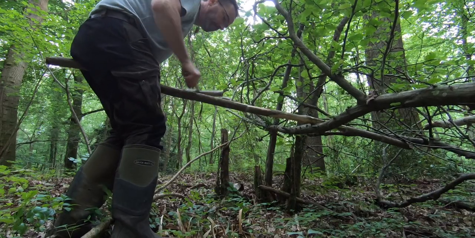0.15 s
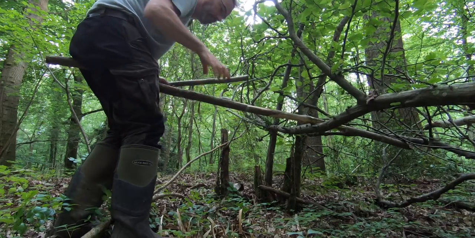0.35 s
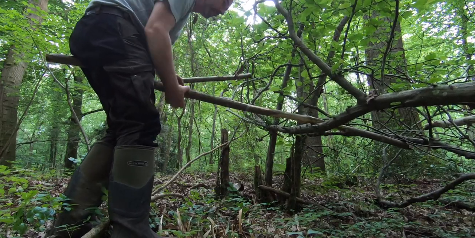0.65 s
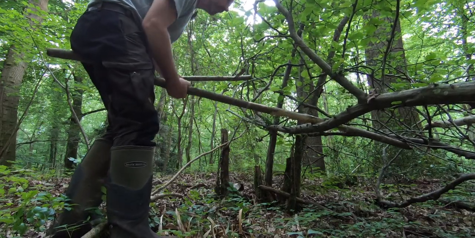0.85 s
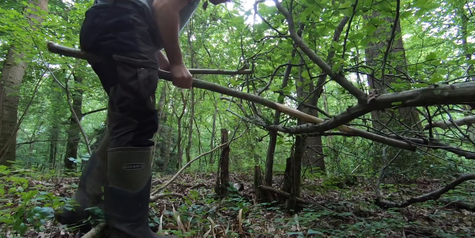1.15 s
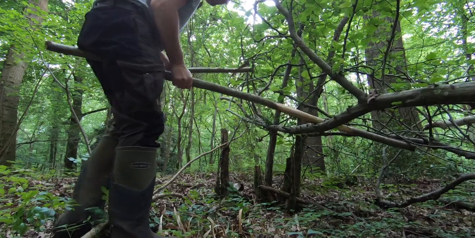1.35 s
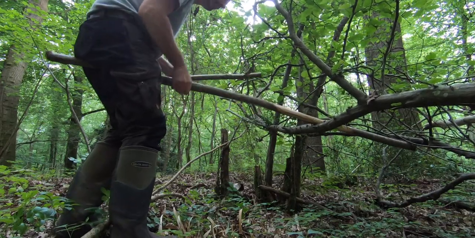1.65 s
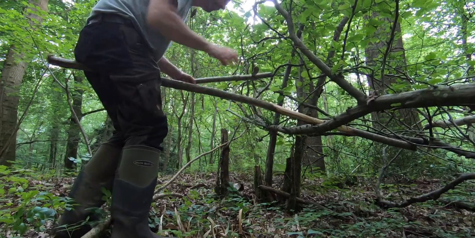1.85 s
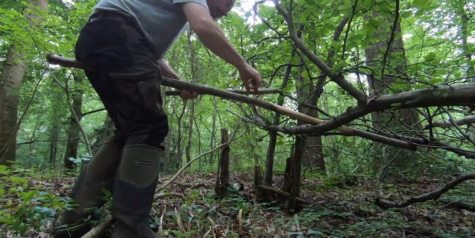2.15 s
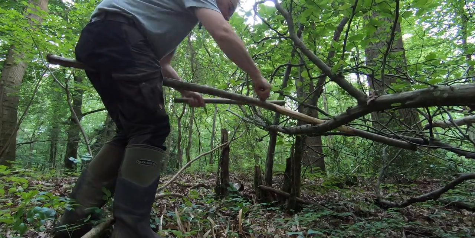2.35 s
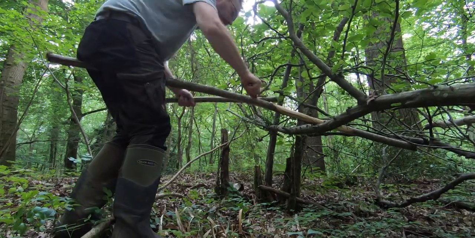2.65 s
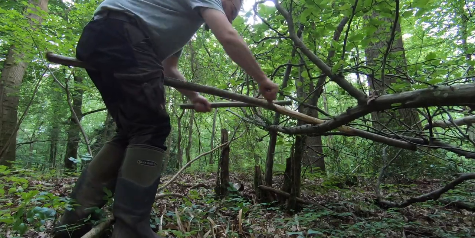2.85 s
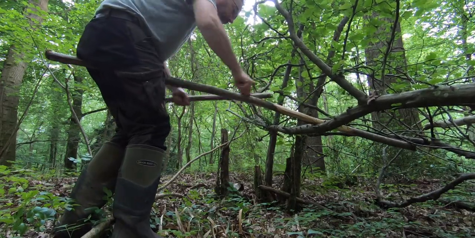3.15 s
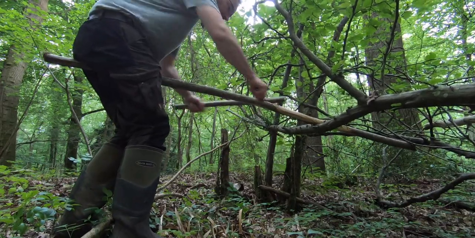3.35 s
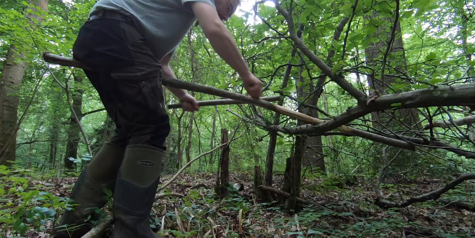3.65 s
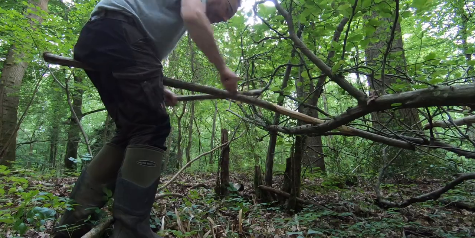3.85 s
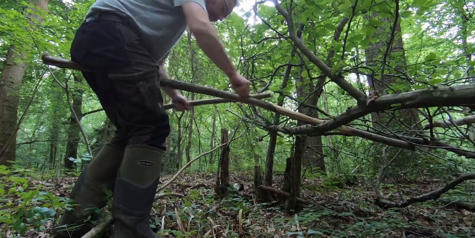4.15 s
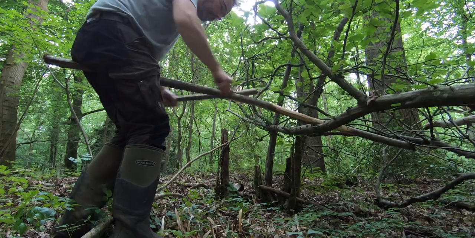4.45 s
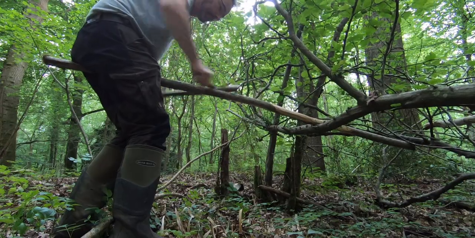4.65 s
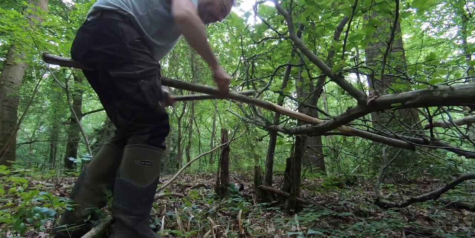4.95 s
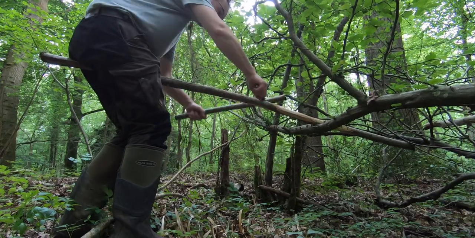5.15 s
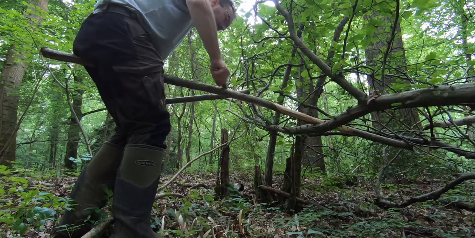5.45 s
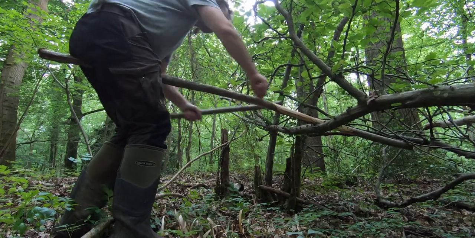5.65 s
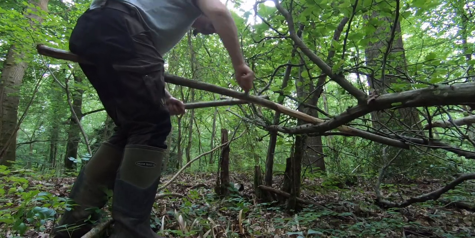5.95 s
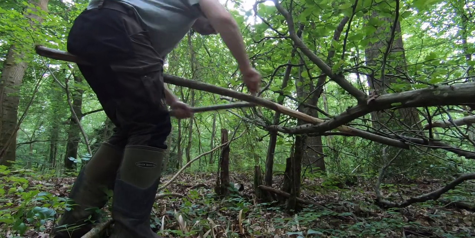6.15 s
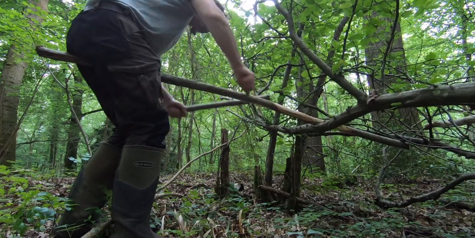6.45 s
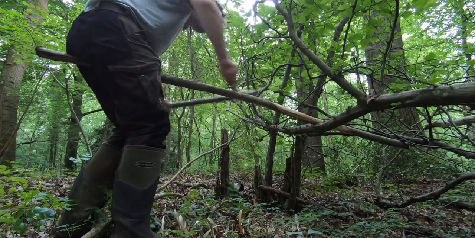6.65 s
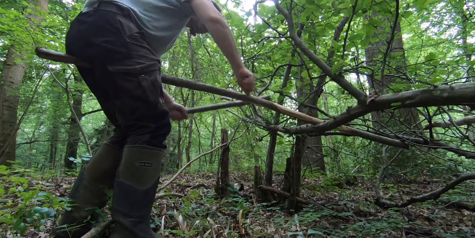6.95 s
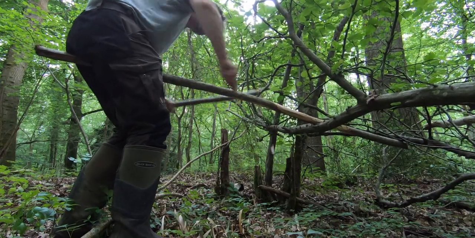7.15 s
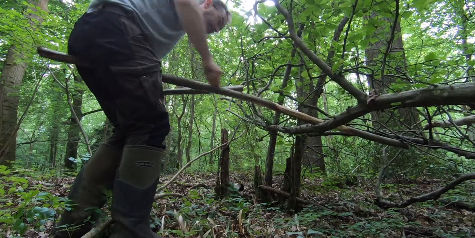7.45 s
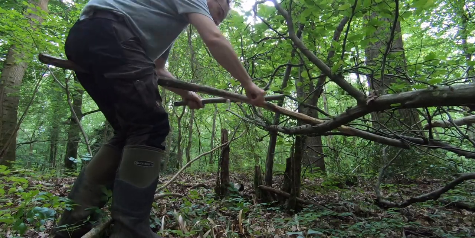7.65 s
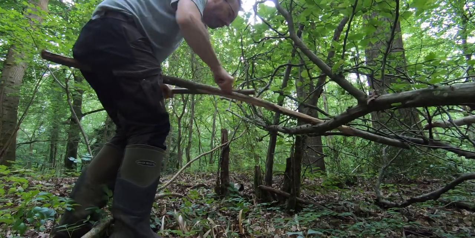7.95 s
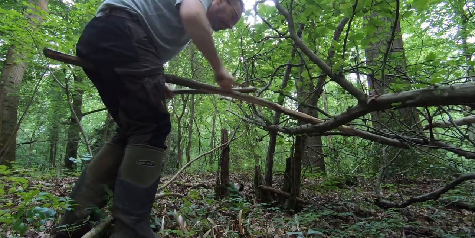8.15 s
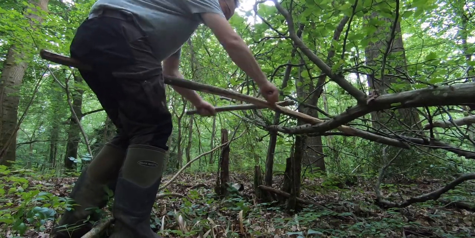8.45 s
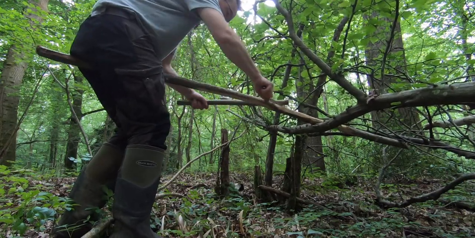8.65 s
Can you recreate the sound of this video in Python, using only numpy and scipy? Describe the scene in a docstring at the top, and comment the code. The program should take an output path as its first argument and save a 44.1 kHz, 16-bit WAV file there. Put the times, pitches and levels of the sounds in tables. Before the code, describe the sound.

A knife shaves a green pole in short raspy strokes with woody knocks and splintering snaps, while faint birds whistle in a quiet woodland.

```python
"""Quiet woodland: a few steps away a knife shaves a green pole, over a far rumble, a low drone and still air.
Random stick-slip impulses ring the pole and blade as the edge chatters; filtered grains make tearing fibres.
Snaps are bursts of resonant noise, knocks are short pushes on the pole's modes, and the blade slides back.
A boot and shifting leaves crackle with coloured grains; two birds, sung by gliding sines, echo among trees."""
import sys
import numpy as np
from scipy import signal
from scipy.fft import rfft, irfft, next_fast_len
from scipy.io import wavfile
from scipy.ndimage import uniform_filter1d, map_coordinates

SR = 44100
rng = np.random.default_rng(int(sys.argv[2]) if len(sys.argv) > 2 else 0)


def bounce(signal):
    """Save signal as a 16-bit WAV file at the path given by the first command-line argument."""
    frames = np.transpose(np.atleast_2d(signal))
    limited = np.clip(frames, -1, 1)
    pcm = np.round(limited * 32767).astype(np.int16)
    wavfile.write(sys.argv[1], SR, pcm)


N = 388521  # length in samples

# In every table, level_db is a relative level: the layers are trimmed again when they are mixed.


def amp(db):
    """Decibels to gain."""
    return 10 ** (np.asarray(db) / 20)


def unit(x):
    """Scale to rms 1."""
    return x / np.sqrt(np.mean(x ** 2) + 1e-20)


def along(points, hz):
    """Read a curve of (Hz, value) points on a log frequency axis."""
    f, v = np.transpose(points)
    return np.interp(np.log(hz + 1), np.log(f + 1), v)


def over_time(points):
    """Read a curve of (s, value) points at every sample."""
    return np.interp(np.arange(N) / SR, *np.transpose(points))


def add(track, s, sound):
    """Mix a sound into a track at time s."""
    part = track[max(round(s * SR), 0):][:len(sound)]
    part += sound[:len(part)]


def wobble(rate):
    """A smooth random curve, rate knots a second."""
    knots = rng.standard_normal(int(N * rate / SR) + 4)
    return map_coordinates(knots, [np.arange(N) * rate / SR])


def filtered(x, response):
    """Filter x by a complex response of frequency."""
    n = x.shape[-1]
    m = next_fast_len(n + 8192)  # padding gives the ringing room to die away
    return irfft(rfft(x, m) * response(np.fft.rfftfreq(m, 1 / SR)), m)[..., :n]


def coloured(x, spectrum):
    """Shape x by a spectrum of (Hz, dB) points, at rms 1."""
    return unit(filtered(x, lambda f: amp(along(spectrum, f))))


def ring(x, modes):
    """Drive a set of resonances (Hz, width Hz, dB) with x."""
    return filtered(x, lambda f: sum(amp(db) * 1j * f * width / (hz * hz - f * f + 1j * f * width)
                                     for hz, width, db in modes))


def slips(rate, spread_db, clump_rate, clump_db):
    """Tiny stick-slip impulses, rate a second on average, whose size varies singly and in clumps."""
    uneven_db = spread_db * np.clip(rng.standard_normal(N), -2, 2)
    size = amp(uneven_db + clump_db * wobble(clump_rate))
    return (rng.random(N) < rate / SR) * rng.choice([-1, 1], N) * size


def pressure(start, rise, hold, fall, steep=1, linger=1):
    """Gain of one stroke: pressure builds through the start time, holds and lets go."""
    range_db, bite_curve, release_curve = 22.5, 1.37, 0.95  # range of the build-up; bend of rise and fall
    t = np.arange(N) / SR - start
    near = (t > -rise) & (t < rise + hold + 3 * fall * linger)
    t, gain = t[near], np.zeros(N)
    building = np.maximum(1 - t / rise, 0) ** bite_curve
    easing = np.maximum((t - rise - hold) / (fall * linger), 0) ** release_curve
    gain[near] = amp(-range_db * (steep * building + easing))
    return gain


def swells(rows, roundness):
    """Gain of light movements (start s, length s, dB), each swelling and fading as a rounded arch."""
    gain = np.zeros(N)
    for s, length, db in rows:
        arch = np.abs(np.sin(np.linspace(0, np.pi, int(length * SR)))) ** roundness
        add(gain, s, amp(db) * arch)
    return gain


# how alike left and right are in the diffuse background: pitch_hz, correlation (1 same, -1 opposed)
ALIKE = [(60, 0.94), (130, 1), (290, 0.48), (640, -0.22), (1410, -0.058), (3100, 1), (6820, 0.44),
         (15000, -0.5)]


def rush(spectrum):
    """Diffuse stereo noise with its mid at rms 1; the mid-side balance sets how alike the ears are."""
    turn = lambda f: np.arccos(np.clip(along(ALIKE, f), -1, 1)) / 2
    balance = lambda f: np.array([np.cos(turn(f)), np.sin(turn(f))])
    mid, side = filtered(rng.standard_normal((2, N)), lambda f: amp(along(spectrum, f)) * balance(f))
    return np.array([mid + side, mid - side]) / np.std(mid)


# slow level curve of the far rumble, before its flutter: time_s, level_db
RUMBLE = [(0, -66), (1.0, -58), (1.55, -62.5), (2.3, -58.5), (3.2, -61.5), (4.8, -66.5), (6.4, -61),
          (7.7, -64.5), (8.8, -58)]


def rumble():
    """Far rumble: bass noise whose level drifts and flutters."""
    spectrum = [(15, -29), (30, -10.0), (48, -0.5), (90, -2.0), (120, -11), (200, -23.5), (500, -66)]
    return amp(over_time(RUMBLE) + 2.1 * wobble(4.2) + 3.1 * wobble(11)) * rush(spectrum)


# slow level curve of the low drone, before its flutter: time_s, level_db
DRONE = [(0, -59.5), (2.3, -55), (4.2, -63), (5.2, -57.5), (6.3, -62.5), (6.9, -58.5), (8.8, -63)]


def drone():
    """Low drone: a band of noise pitched above the rumble, flickering a little."""
    spectrum = [(60, -30), (120, -6.5), (160, 3.5), (200, -1), (260, -9.5), (320, -13.5), (450, -21.5), (900, -68)]
    return amp(over_time(DRONE) + 0.5 * wobble(3.16) + 1.64 * wobble(14)) * rush(spectrum)


# spectrum of the still air: pitch_hz, level_db
AIR = [(150, 7.5), (450, -4), (800, 5.5), (1400, 0.5), (2500, 0.5), (4000, -3), (6500, -10), (10000, -14),
       (11500, -22.5), (14500, -31), (15700, -37)]


def air():
    """Still air: soft broad noise that swells slowly."""
    return amp(-63 + 1.5 * wobble(1.66)) * rush(AIR)


# leaves rustle as the worker shifts about: start_s, length_s, level_db
RUSTLES = [(0, 0.69, -66), (.8, 1.72, -62.5), (3.1, 0.64, -60.5), (3.8, 1.5, -61.5), (4.8, 0.27, -56.5),
           (5.9, 0.55, -65.5), (7.2, 1.1, -65.5), (8.25, 0.24, -59)]


def rustle():
    """Light leaf rustle: clumped grains, drawn separately for left and right."""
    leaves = [(500, -1), (3000, 2.5), (6000, 0.5), (10000, -4.5), (11500, -15), (14000, -18), (15500, -40)]
    grains = [slips(rate=3000, spread_db=4.0, clump_rate=45, clump_db=6) for _ in range(2)]
    return amp(-2.5) * swells(RUSTLES, roundness=0.32) * np.array([coloured(x, leaves) for x in grains])


# notes of a far songbird: start_s, length_s, start_hz, end_hz, level_db, trill_depth_hz
SONG = [(0, 0.054, 2600, 2737, -53, 17), (0, 0.18, 2820, 2740, -65.5, 30), (0.02, .4, 2271, 2329, -62, 5.5),
        (0.499, 0.19, 2150, 1947, -60.5, 200), (1.284, 0.085, 1885, 2036, -62.5, 91),
        (1.64, 0.28, 2350, 2634, -63.5, 180), (1.822, 0.047, 3224, 3210, -53.5, 220),
        (2.065, 0.03, 3550, 3486, -56, 97), (2.142, 0.061, 3860, 3975, -60, 50),
        (2.225, 0.053, 5230, 4850, -55.5, 34), (2.268, 0.056, 4890, 5020, -57, 20),
        (2.305, 0.072, 5010, 4380, -57, 20), (2.47, 0.088, 1840, 1812, -61.5, 61),
        (2.731, 0.11, 2370, 2206, -57, 270), (2.89, 0.094, 2756, 2706, -54.5, 13),
        (3.335, 0.089, 2063, 1980, -57, 88), (3.55, 0.12, 1882, 1821, -56, 16),
        (3.747, 0.13, 2000, 2290, -56.5, 130)]


def songbird(trill_rate=70):
    """Gliding sine notes, each trilled in pitch trill_rate times a second."""
    out = np.zeros(N)
    for s, length, start_hz, end_hz, db, trill_hz in SONG:
        t = np.arange(int(length * SR)) / SR
        hz = np.linspace(start_hz, end_hz, len(t)) + trill_hz * np.sin(2 * np.pi * trill_rate * t)
        tone = np.sin(2 * np.pi * np.cumsum(hz) / SR)
        add(out, s, amp(db) * signal.windows.tukey(len(t), .4) * tone)
    return out


# modes of the pole: pitch_hz, width_hz, level_db
POLE = [(738, 29, -8), (866.6, 47, 6), (1030, 150, -2.5), (1252, 37, -4.5), (1730, 71, -1),
        (2540, 270, -11.5), (3400, 79, -20)]


def pole(x, detune=0.07, travel_rate=7):
    """The pole's modes shift as blade and grip travel along it, here a random path over three places."""
    place = np.clip(wobble(travel_rate), -1, 1)
    out = np.zeros(N)
    for k in (-1, 0, 1):
        share = np.sqrt(np.clip(1 - abs(place - k), 0, 1))
        modes = [(hz * (1 + detune * k), width, db + rng.normal(0, 3.64)) for hz, width, db in POLE]
        out += ring(x * share, modes)
    return out


# the wood radiates little bass or high treble: pitch_hz, level_db
WOOD = [(200, -34), (430, -2), (650, 1), (4000, 2), (6500, -5), (10000, -4), (15000, -15)]


def radiated(x):
    """Colour a vibration as the wood radiates it, at rms 1."""
    return coloured(x, WOOD)


def shifting(x, depth_db):
    """The curling shaving has changing resonances of its own: a smooth random field over time and pitch."""
    z = signal.stft(x, nperseg=512)[2]
    field = uniform_filter1d(rng.standard_normal(z.shape), size=3, axis=0)
    field = uniform_filter1d(field, size=7, axis=1)
    return signal.istft(z * amp(depth_db * unit(field)), nperseg=512)[1][:N]


# resonances of the blade in the cut: pitch_hz, width_hz, level_db
BLADE = [(1900, 230, 3), (2720, 700, 14), (3540, 440, 12), (3900, 500, -46), (5355, 160, 19)]


def scrape():
    """The edge's stick-slip rings the blade, coloured by the shaving and the wood."""
    catches = slips(rate=1400, spread_db=1.5, clump_rate=110, clump_db=2.5)
    return radiated(shifting(ring(catches, BLADE), depth_db=4))


# resonances of the steel itself: pitch_hz, width_hz, level_db
STEEL = [(1800, 310, 4.5), (3400, 130, -4.5), (5700, 100, 10.5), (6000, 37, -8)]


def steel():
    """Dense uneven slips make the steel itself sing."""
    return radiated(ring(slips(rate=3000, spread_db=6, clump_rate=60, clump_db=7.0), STEEL))


# spectrum of tearing fibres: pitch_hz, level_db
FIBRES = [(300, -33), (2000, 0), (4500, 0), (6500, 0), (8300, -1.5), (9800, 3), (11200, -8), (13500, -8.5),
          (15500, -47)]


def tear():
    """Fine fibres part in a dense crackle coloured by the shaving."""
    breaks = slips(rate=5600, spread_db=1.0, clump_rate=280, clump_db=2.6)
    return coloured(shifting(breaks, depth_db=3.5), FIBRES)


# cuts of the knife (already biting at start_s):
# start_s, biting_in_s, full_depth_s, running_out_s, chatter_level_db, scrape_level_db, tearing_level_db
CUTS = [ (0.0, 0.0013, 0.029, 0.047, -43.5, -56, -58.5), (2.595, .065, 0.054, 0.082, -53.5, -57, -62),
        (2.99, 0.052, 0.03, 0.035, -48, -50.5, -58), (3.083, 0.02, 0.0032, 0.048, -39, -52, -39),
        (3.435, 0.066, .05, 0.054, -43, -52, -48), (3.58, 0.016, .003, 0.037, -66, -61, -54),
        (3.838, 0.078, 0.027, 0.1, -41.5, -48, -46.5), (4.231, 0.059, 0.017, 0.025, -48.5, -52.5, -52),
        (4.322, 0.024, 0.039, 0.048, -44.5, -51, -45.5), (4.685, 0.093, 0.0043, 0.039, -41, -47, -44),
        (5.286, 0.098, 0.019, .06, -45.5, -52, -51.5), (5.42, 0.04, .01, 0.13, -52.5, -56.5, -57),
        (5.86, 0.087, .006, 0.047, -40, -49, -51.5), (6.285, 0.01, 0.0088, 0.077, -46, -53.5, -53.5),
        (6.64, 0.047, 0.021, 0.052, -51.5, -58.5, -60.5), (6.76, 0.049, .03, 0.019, -56, -60, -58),
        (7.135, 0.096, 0.007, 0.023, -45, -55.5, -52.5), (7.295, 0.046, .008, 0.024, -45, -54.5, -49.5),
        (7.804, 0.046, 0.048, .1, -48, -54.5, -48.5), (7.9, 0.057, 0.0085, 0.024, -49, -48, -45),
        (7.978, 0.02, 0.038, 0.047, -58, -56, -45), (8.04, 0.026, 0.033, 0.044, -56.5, -61, -52.5),
        (8.53, 0.057, 0.051, 0.049, -56, -61.5, -57), ]


def cuts():
    """The edge catches and slips: the pole and blade ring, and fine fibres tear as it bites deeper."""
    bite, edge, tearing = np.zeros((3, N))
    for s, rise, hold, fall, chatter_db, edge_db, tear_db in CUTS:
        bite += amp(chatter_db) * pressure(s, rise, hold, fall)
        # the edge already scrapes under light pressure
        edge += amp(edge_db) * pressure(s, rise, hold, fall, steep=0.76)
        # fibres tear 3.6 ms late, need a deeper cut and go on parting after it
        tearing += amp(tear_db) * pressure(s + 0.0036, rise, hold, fall, steep=1.44, linger=1.35)
    catches = slips(rate=900, spread_db=0.0, clump_rate=120, clump_db=3)
    chatter = radiated(pole(catches))
    flex = unit(ring(ring(catches, [(155.0, 62, 0)]), [(156, 250, 0)]))  # the whole pole bends
    singing = np.minimum(amp(1.0) * edge, amp(-53))  # capped: a deep cut damps the steel
    wood = bite * (amp(-1.0) * chatter + amp(-6.0) * flex)
    blade = amp(2.5) * edge * scrape() + singing * steel()
    return wood + blade + amp(-0.5) * tearing * tear()


# blade and stick knocking on the pole: start_s, level_db, struck_spot_hz
KNOCKS = [(.012, -37.5, 830), (.616, -48, 614), (0.8246, -43, 660), (2.409, -35, 950), (3.087, -38, 900),
          (3.108, -27.5, 1090), (3.872, -35.5, 860), (3.887, -29.5, 970), (4.678, -39, 930),
          (4.745, -32, 876), (5.069, -31.5, 600), (5.119, -42.5, 800), (5.155, -36, 970),
          (5.29, -40.5, 900), (5.372, -35, 980), (5.695, -42, 845), (5.731, -36.5, 860),
          (6.102, -47.5, 860), (6.271, -44.5, 1010), (6.301, -40, 900), (7.275, -34, 830),
          (7.3475, -20, 860), (7.3506, -41, 930), (7.356, -29.5, 875), (7.629, -40, 980),
          (8.356, -38.5, 975), (8.389, -36, 910), (8.427, -39, 860)]


def knocks(contact=0.00086, rattle_db=-30, rattle_t60=.04, spot_width_hz=210, pole_db=-7, flex_db=-16):
    """A short push rings the struck spot and the whole pole; the bark rattles briefly."""
    out, t = np.zeros(N), np.arange(SR // 10) / SR
    u = 4 * t / contact  # the push peaks a quarter of the way through the contact time (s)
    push = u * np.exp(-u)
    for s, db, hz in KNOCKS:
        rattle = amp(rattle_db - 60 * t / rattle_t60) * rng.standard_normal(len(t))
        force = push + signal.fftconvolve(push, rattle)[:len(t)]
        modes = [(f, width, pole_db + level + rng.normal(0, 0.62)) for f, width, level in POLE]
        blow = ring(ring(force, modes + [(hz, spot_width_hz, 0)]), [(hz, 1.35 * hz, 0)])
        # a thin pole radiates little below the note of the struck spot
        blow = signal.sosfilt(signal.butter(2, 0.85 * hz, "high", fs=SR, output="sos"), blow)
        blow = blow + ring(force, [(162, 77, flex_db)])  # the whole pole bends
        add(out, s, amp(db) * blow / np.abs(blow).max())
    return out


# light slides of the blade back up the pole: start_s, length_s, level_db
SLIDES = [(.06, 0.1, -57.5), (3.27, 0.047, -54.5), (3.32, 0.076, -62.5), (3.68, .11, -65),
          (4.12, 0.09, -61.5), (4.46, 0.2, -61.5), (4.97, 0.11, -61.5), (5.12, 0.063, -50),
          (5.59, 0.21, -60.5), (6.52, .1, -62), (7.02, 0.086, -57.5), (7.465, 0.06, -57.5),
          (7.545, 0.063, -62), (7.622, 0.12, -49.5), (8.27, 0.2, -54.5), (8.465, 0.028, -55.5)]


def slides():
    """Drawn back without pressure, the blade skips over the bark and rings the pole."""
    skips = slips(rate=700, spread_db=0.5, clump_rate=120, clump_db=2.5)
    return amp(2) * swells(SLIDES, roundness=0.48) * radiated(pole(skips))


# spectrum of the leaf litter: pitch_hz, level_db
LITTER = [(240, -45), (400, -9.5), (816, -11), (1410, -5), (2000, -4.5), (2390, -6), (3720, -6),
          (7030, -18.5), (9230, -21), (15000, -42)]
# a boot presses into the litter (already loading at start_s):
# start_s, loading_s, full_weight_s, easing_off_s, leaves_level_db, soil_level_db
STEPS = [(.68, .13, .015, .06, -60, -67), (.84, 0.27, 0.11, 0.11, -55, -61.5),
         (1.26, 0.13, 0.067, .25, -68.5, -68)]


def step():
    """Dead leaves crackle under a boot and the soil beneath them crunches."""
    leaves = coloured(slips(rate=2500, spread_db=0.5, clump_rate=83, clump_db=1.5), LITTER)
    soil = coloured(slips(rate=600, spread_db=4.5, clump_rate=80, clump_db=0.0),
                    [(300, -18), (650, 3.5), (850, 7), (1400, -18), (2500, -36)])
    return sum(pressure(s, rise, hold, fall) * (amp(leaves_db + 3.0) * leaves + amp(soil_db + 0.5) * soil)
               for s, rise, hold, fall, leaves_db, soil_db in STEPS)


# fibres and splinters breaking: start_s, level_db, centre_hz
SNAPS = [(0.826, -45, 2220), (1.123, -37, 8040), (1.148, -26, 1980), (2.621, -41, 4470),
         (2.820, -43.5, 9000), (3.109, -23.5, 1930), (3.108, -16, 6950), (3.604, -32, 7200),
         (3.942, -27, 6960), (4.187, -40.5, 8100), (4.340, -25.5, 3460), (4.398, -24, 4000),
         (4.621, -44, 5000), (4.779, -22.5, 5160), (4.808, -29, 3980), (4.993, -40, 2000),
         (5.069, -25.5, 2650), (5.938, -31, 1800), (6.297, -43, 6100), (7.336, -23, 5800),
         (7.348, -31, 7000), (7.952, -23.5, 8300), (7.965, -25, 7250), (7.988, -19.5, 9500),
         (8.002, -24, 8000), (8.019, -28, 6030), (8.031, -17.5, 3460), (8.634, -35.5, 8000)]


def snaps(crack_db=4, crack_t60=0.0015, splinter_t60=.045, breadth=0.33):
    """A splinter parts with a crack and a short burst of tearing: resonant noise with two decays."""
    out, t = np.zeros(N), np.arange(SR // 16) / SR
    for s, db, hz in SNAPS:
        decay = amp(-60 * t / splinter_t60) + amp(crack_db - 60 * t / crack_t60)
        burst = rng.standard_normal(len(t)) * decay
        add(out, s, amp(db - 22.5) * unit(ring(burst, [(hz, hz * breadth, 0)])))
    return filtered(out, lambda f: amp(along([(9800, -5), (11500, -11), (15500, -18)], f)))


# a second bird repeats one arched whistle: start_s, level_db, length_s, top_hz
WHISTLES = [(5.474, -55.5, 0.25, 2563), (6.181, -53.5, 0.25, 2560), (7.008, -52.5, .3, 2560),
            (7.686, -54, .36, 2582)]
# shape of the whistle: share_of_length, share_of_top_hz, level_db
ARCH = [(0, .82, 2), (.1, .94, -0.5), (.21, 0.99, 4.5), (0.341, 0.95, 2), (0.478, .87, 2.5),
        (.7, .83, -1.5), (1, .8, -11)]


def whistler():
    """A sine whistle whose pitch and level follow one arch."""
    out = np.zeros(N)
    at, pitch, level = np.transpose(ARCH)
    for s, db, length, top_hz in WHISTLES:
        u = np.linspace(0, 1, int(length * SR))
        tone = np.sin(2 * np.pi * np.cumsum(top_hz * np.interp(u, at, pitch)) / SR)
        add(out, s, amp(db + np.interp(u, at, level)) * signal.windows.tukey(len(u), .1) * tone)
    return out


# decay of the echo among the trees: pitch_hz, t60_s
TREES = [(150, 0.83), (1000, 0.34), (2500, 1.45), (6000, 0.82), (14000, 0.97)]


def echo(x, width_db=-4):
    """Trunks scatter the sound into a diffuse stereo tail of decaying noise."""
    hz, t, z = signal.stft(rng.standard_normal((2, SR)), SR, nperseg=256)
    tail = signal.istft(z * amp(-60 * t / along(TREES, hz)[:, None]), SR, nperseg=256)[1]
    tail = tail / np.linalg.norm(tail[0])
    mid, side = signal.fftconvolve(x[None], tail, axes=1)[:, :N] * amp([[0], [width_db]])
    return np.array([mid + side, mid - side])


# stereo width of the near work: pitch_hz, side_gain_db
WIDTH = [(60, -21), (200, -24), (380, -7), (700, -10), (1290, -5), (2380, -11.5), (4400, -16.5),
         (8000, 2.5), (15000, -2.5)]


def spread(x, drift_rate=25):
    """Scatter makes left and right differ: a smeared side signal whose phase drifts at random."""
    t = np.arange(SR // 50) / SR
    scatter = rng.standard_normal(len(t)) * amp(-60 * t / .007)
    flat = np.exp(1j * np.angle(rfft(scatter)))  # keeps the delays, evens out the colour
    smeared = signal.fftconvolve(x, irfft(flat)[:len(t) // 2])[:N]
    side = filtered(smeared, lambda f: amp(along(WIDTH, f)))
    side = np.real(signal.hilbert(side, next_fast_len(N))[:N] * np.exp(2j * wobble(drift_rate)))
    return np.array([x + side, x - side])


def scene():
    """Near woodwork, far birds and the forest around them."""
    work = cuts() + knocks() + slides() + step() + snaps()
    near = spread(work) * amp([[-.3], [.3]]) + amp(-17.5) * echo(work)  # a touch to the right
    song = songbird() + whistler()
    # a big trunk returns the song 71 ms later
    answer = filtered(song, lambda f: amp(-11.0) * np.exp(-2j * np.pi * f * 0.071))
    far = amp(-1.5) * song + answer + echo(song)
    return near + far + rumble() + drone() + air() + rustle()


def record(dry):
    """Nothing is kept above the band limit of 15.7 kHz."""
    return filtered(dry, lambda f: f < 15700)


dry = scene()
out = record(dry)
bounce(out)
```